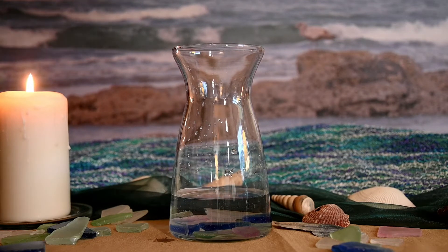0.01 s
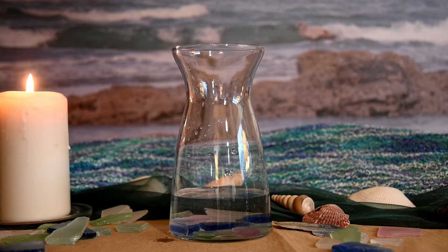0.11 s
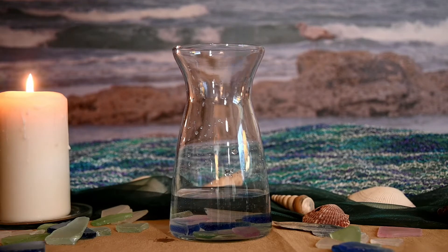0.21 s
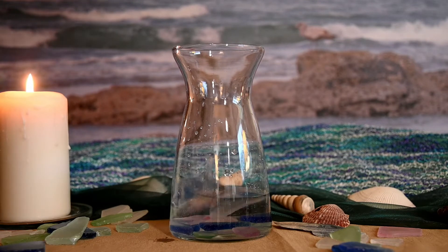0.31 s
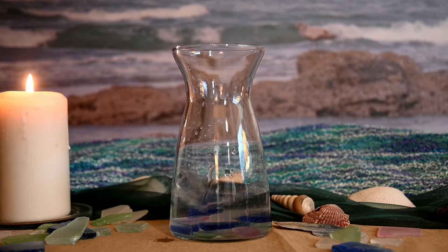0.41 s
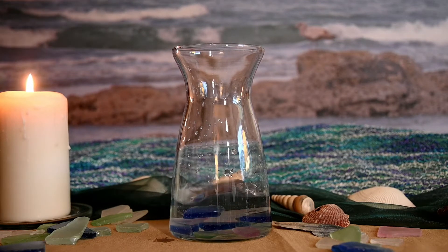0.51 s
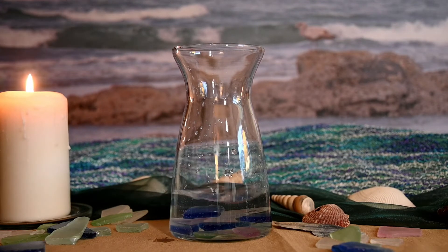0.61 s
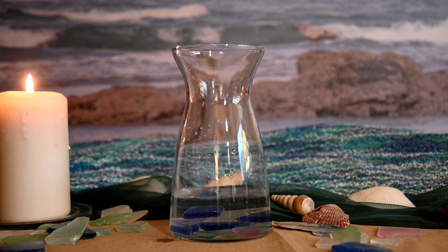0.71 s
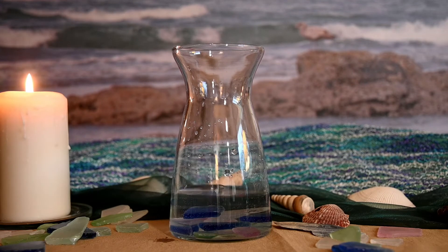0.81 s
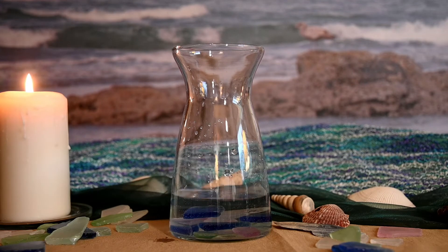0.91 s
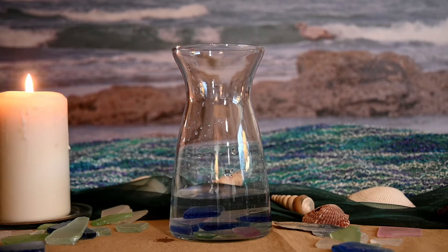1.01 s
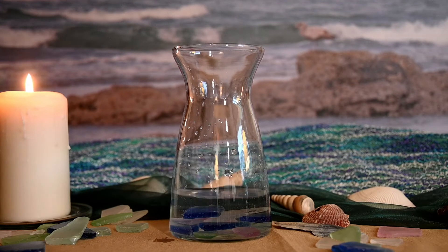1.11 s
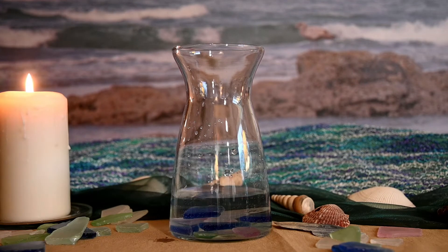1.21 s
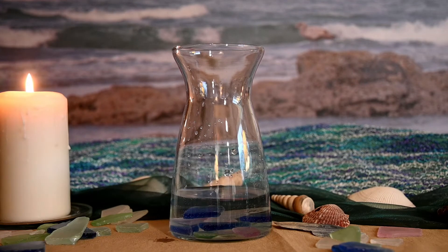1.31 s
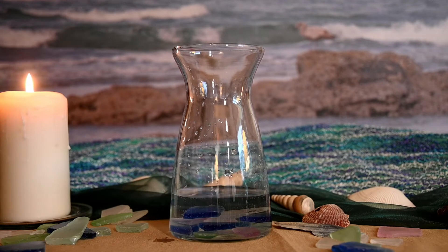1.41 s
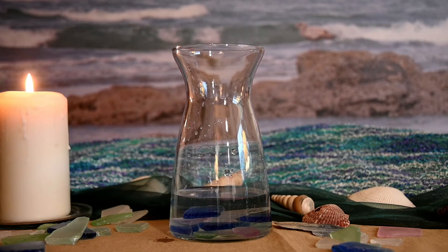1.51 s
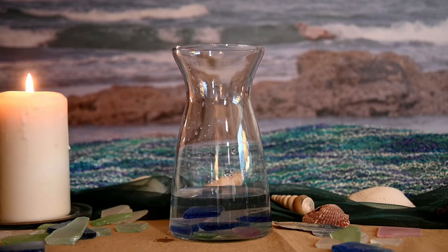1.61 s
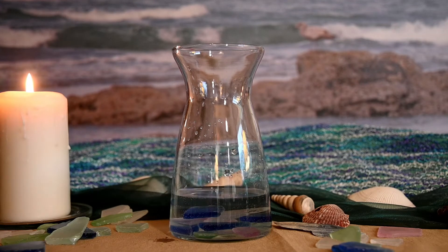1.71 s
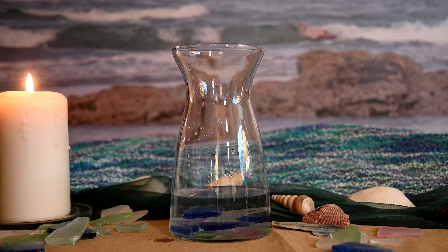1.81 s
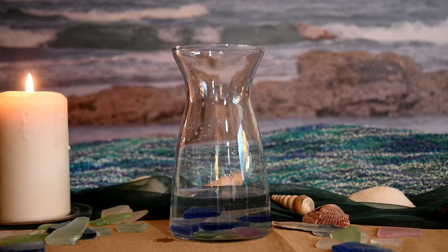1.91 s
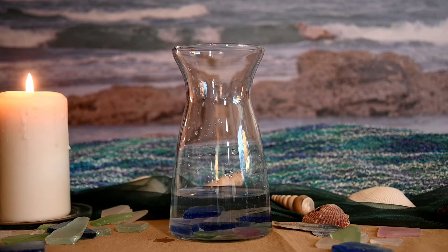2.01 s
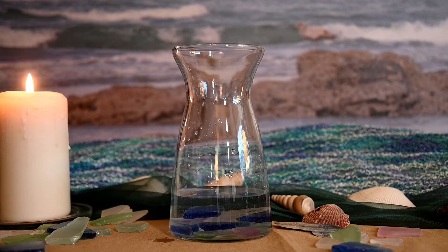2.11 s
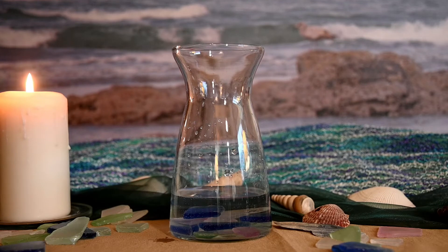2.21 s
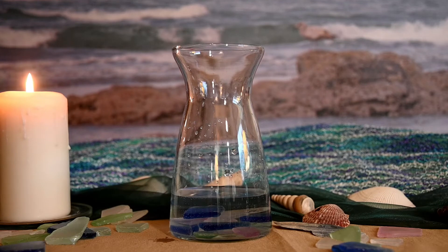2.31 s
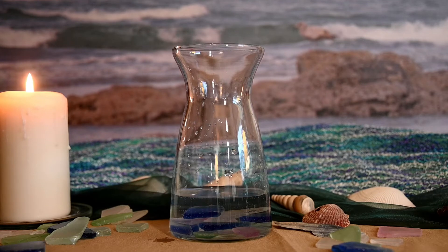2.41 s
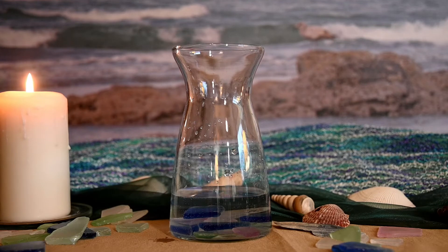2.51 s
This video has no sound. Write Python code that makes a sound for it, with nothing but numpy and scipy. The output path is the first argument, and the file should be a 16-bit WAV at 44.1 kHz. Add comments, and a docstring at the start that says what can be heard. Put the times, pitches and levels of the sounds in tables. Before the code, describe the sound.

A small glass piece strikes a carafe wall, then its base under shallow water, with a bright clink, small splash and brief rattle; afterwards a hand clicks among loose pieces at left. Close stereo microphone, quiet humming room.

```python
"""A glass carafe with a little water takes a dropped piece of glass: decaying modes, cracks and noise bands
sound a blow on the wall, then one on the base; rough rings rock and settle, two bubbles fall in pitch.
Grainy noise splashes. A hand on the left rustles (noise) and clicks (short wave packets) among loose
pieces, with two dull taps and a faint gliding whistle. Steady noise and a wavering hum make the room."""
import sys
import numpy as np
from scipy import signal
from scipy.fft import rfft, irfft
from scipy.io import wavfile

SR = 44100
rng = np.random.default_rng(int(sys.argv[2]) if len(sys.argv) > 2 else 0)


def bounce(signal):
    """Save signal as a 16-bit WAV file at the path given by the first command-line argument."""
    frames = np.transpose(np.atleast_2d(signal))
    limited = np.clip(frames, -1, 1)
    pcm = np.round(limited * 32767).astype(np.int16)
    wavfile.write(sys.argv[1], SR, pcm)


def boost_factor(decibels):
    """Convert a level in decibels to a linear amplitude factor."""
    exponent = np.asarray(decibels, float) / 20
    return 10 ** exponent


N = 114660
T = np.arange(N) / SR
OPPOSITE = np.array([[1], [-1]])  # opposite sign on the two sides
TREBLE_MODE_HZ = 5000  # glass modes above this are changed by sinking and settling
HAND_PAN_DB, LEFT_LEAD_SAMPLES = 5.5, 6


def logint(hz, table):
    """Read (Hz, value) points on a log frequency axis."""
    points = np.array(table, float)
    return np.interp(np.log(np.maximum(hz, 1)), np.log(points[:, 0]), points[:, 1])


def shaped(gain, size=N):
    """Noise of rms 1 with the spectrum gain(Hz)."""
    hz = np.arange(size // 2 + 1) * SR / size
    noise = irfft(rfft(rng.standard_normal(size)) * gain(hz), size)
    return noise / np.std(noise)


def bell(hz, octaves):
    """Gain curve, Gaussian in log frequency."""
    return lambda f: np.exp(-.5 * (np.log2(np.maximum(f, 1) / hz) / octaves) ** 2)


def band(hz, width_hz, order=4):
    """Gain curve of a band of a given width."""
    return lambda f: 1 / (1 + (2 * (f - hz) / width_hz) ** order)


def lowpass(hz, order):
    """Gain curve falling above hz."""
    return lambda f: 1 / (1 + (f / hz) ** order)


def spectrum(table):
    """Gain curve from (Hz, dB) points."""
    return lambda f: boost_factor(logint(f, table))


def fade(t, t60):
    """Exponential decay from t = 0, 60 dB in t60 seconds."""
    return np.exp(-np.log(1000) * np.maximum(t, 0) / t60) * (t >= 0)


def pair(x, pan_db, lead=0):
    """Two channels, left minus right in dB; the left leads by some samples."""
    return np.array([x * boost_factor(pan_db / 2), np.roll(x, lead) * boost_factor(-pan_db / 2)])


def add(out, s, x):
    """Mix a short stereo sound in at s seconds."""
    i = int(s * SR)
    out[:, i:i + x.shape[1]] += x[:, :N - i]


def curve(table, col):
    """Gain over time from a dB column."""
    points = np.array(table, float)
    return boost_factor(np.interp(T, points[:, 0], points[:, col]))


def burst(t, gain, t60, rise_s=.0001):
    """Noise with a fast rise and an exponential decay."""
    return fade(t, t60) * (1 - np.exp(-(t / rise_s) ** 2)) * shaped(gain, len(t))


def ring(t, hz, t60, pan_db, turn_rad):
    """Decaying mode that swells within a cycle; the sides differ by a phase turn."""
    side = np.array([[.5], [-.5]])
    swell = 1 - np.exp(-t * hz * 3.2)
    return boost_factor(side * pan_db) * fade(t, t60) * swell * np.sin(2 * np.pi * hz * t + side * turn_rad)


def tick(t, hz, cycles):
    """Hard contact: a few cycles at random phase, the envelope rising faster than it falls."""
    u = t * hz - 2 * cycles
    envelope = np.exp(-.5 * (u / cycles) ** 2 * np.where(u < 0, 2, .5))
    return envelope * np.cos(2 * np.pi * u + 2 * np.pi * rng.random())


def scatter(x, count=4):
    """Reflections off neighbouring pieces: quick echoes of random delay, size and sign."""
    longest_s, echo_db = .0013, -6.5
    lags_s, sizes = rng.random(count) * longest_s, rng.standard_normal(count)
    out = x
    for lag_s, size in zip(lags_s, sizes):
        gain = boost_factor(echo_db) * size * np.exp(-lag_s / longest_s)
        out = out + gain * np.roll(x, 3 + int(lag_s * SR))
    return out


def grains():
    """Sparse random impulses of uneven size, smeared over about 1 ms, mean power 1."""
    rate_per_s, spread_db = 2900, 2.5
    g = (rng.random(N) < rate_per_s / SR) * boost_factor(spread_db * rng.exponential(size=N))
    g = signal.lfilter([1], [1, -.97], g)
    return g / np.sqrt(np.mean(g ** 2))


# Room noise spectrum. Each row: frequency in Hz, relative density in dB per Hz.
ROOM_COLOUR = [(15, -30), (30, 1), (60, -12.5), (100, -3.5), (150, -6.5), (220, -10.5), (400, -13.5),
               (800, -19.5), (1500, -21.5), (3000, -27.5), (5500, -34.5), (8000, -42.5), (12000, -42.5),
               (16000, -46)]
# Likeness of the two sides. Each row: frequency in Hz, likeness from -1 to 1.
SIDE_LIKENESS = [(60, .93), (130, .96), (290, .85), (640, .5), (1410, .4), (3100, -.1), (6820, 0),
                 (15000, .1)]
# Hum bands. Each row: centre in Hz, width in Hz, level in dB.
HUM_BANDS = [(106, 14, -69.5), (137, 29, -59)]


def room():
    """Steady noise, alike on both sides in the bass, plus narrow noise bands as a wavering hum."""
    like = lambda f: np.clip(logint(f, SIDE_LIKENESS), -.9, .98)
    shared = lambda f: spectrum(ROOM_COLOUR)(f) * np.sqrt(1 + like(f))
    opposed = lambda f: spectrum(ROOM_COLOUR)(f) * np.sqrt(1 - like(f))
    f = np.arange(N // 2 + 1) * SR / N
    ratio = np.sqrt(np.sum(opposed(f) ** 2) / np.sum(shared(f) ** 2))
    out = boost_factor(-56) * (shaped(shared) + ratio * shaped(opposed) * OPPOSITE)
    for hz, width_hz, db in HUM_BANDS:
        out = out + boost_factor(db) * shaped(band(hz, width_hz, order=2))
    return out


# Whistle glide. Each row: time in seconds, frequency in Hz, level in dB before panning.
WHISTLE_PATH = [(1.6, 12000, -90), (1.63, 11300, -78), (1.67, 10300, -76), (1.7, 10000, -90),
                (1.74, 10300, -80), (1.9, 10400, -80), (2.0, 10500, -77), (2.06, 10900, -81),
                (2.08, 11000, -100)]


def whistle():
    """A thin, faint sine whose frequency follows the path."""
    path = np.array(WHISTLE_PATH, float)
    hz = np.interp(T, path[:, 0], path[:, 1])
    tone = np.sin(2 * np.pi * np.cumsum(hz) / SR)
    sounding = (T > path[0, 0]) * (T < path[-1, 0])
    return pair(curve(WHISTLE_PATH, 2) * sounding * tone, HAND_PAN_DB, LEFT_LEAD_SAMPLES)


# Rustle drive. Each row: time in seconds, then relative dB of the hiss, of its top band, of its low band.
RUSTLE_DRIVE = [(.55, -68, -96, -84), (.66, -74.5, -89, -86), (.75, -67, -76, -68), (.86, -73, -83, -70),
                (.89, -66.5, -77, -66.5), (.94, -70.5, -68, -71), (1.0, -69, -83, -76),
                (1.04, -73.5, -75, -78), (1.12, -71, -87.5, -70.5), (1.25, -71.5, -89, -62),
                (1.31, -76, -93.5, -74), (1.39, -78, -89, -73.5), (1.42, -63.5, -71, -67),
                (1.46, -60.5, -76, -69), (1.50, -72, -96, -70), (1.525, -64.5, -68, -70),
                (1.57, -73.5, -88, -67.5), (1.60, -62, -75, -67), (1.64, -79, -91, -70.5),
                (1.73, -73.5, -77.5, -70), (1.76, -62, -75, -64.5), (1.81, -63, -60, -67.5),
                (1.84, -56, -62, -65), (1.87, -60.5, -65, -67), (1.89, -75, -89, -72.5),
                (2.04, -68.5, -87, -69), (2.1, -52, -78, -66), (2.2, -69, -93, -70),
                (2.3, -59.5, -68, -63.5), (2.38, -57, -68, -66.5), (2.43, -77, -100, -74.5),
                (2.6, -73, -85.5, -78)]
# Hiss spectrum. Each row: frequency in Hz, relative density in dB per Hz.
HISS_COLOUR = [(1000, -40), (2200, -3), (3600, 0), (5400, 1), (7500, -4), (10000, -8), (12000, -12),
               (16000, -16)]
# Top band. Each row: centre in Hz, width in Hz, relative level in dB.
TOP_BANDS = [(14800, 450, 0), (15550, 400, -1)]


def rustle():
    """The hand's friction: three grainy noise bands, each with a left-leading part and a wide part."""
    out = np.zeros((2, N))
    top = lambda f: sum(boost_factor(db) * band(hz, width_hz)(f) for hz, width_hz, db in TOP_BANDS)
    grit = 1 + boost_factor(-6) * grains()
    started = T > RUSTLE_DRIVE[0][0]
    for col, gain in enumerate((spectrum(HISS_COLOUR), top, bell(1130, 1)), start=1):
        wide = boost_factor(1.0) * np.array([shaped(gain), shaped(gain)])
        noise = pair(shaped(gain), HAND_PAN_DB, LEFT_LEAD_SAMPLES) + wide
        out += curve(RUSTLE_DRIVE, col) * started * grit * noise
    return out


# Dull taps. Each row: start in seconds, drive in dB, centre in Hz.
DULL_TAPS = [(0.7279, -37, 1067), (1.5265, -37, 1900)]


def taps():
    """A short wave packet with a little noise round the same centre."""
    out, t = np.zeros((2, N)), T[:4096]
    for s, db, hz in DULL_TAPS:
        tap = tick(t, hz, .27) + .17 * burst(t, bell(hz, .35), .022)
        add(out, s, pair(boost_factor(db) * tap, 0))
    return out


# Loose pieces. Each row: start in seconds, drive in dB, centre in Hz, left minus right in dB of the click,
# relative top ring in dB, relative body in dB.
PIECE_CLICKS = [(0.8818, -39, 6140, 3, 2, -10), (0.9245, -38, 5350, 8, -4, -11),
                (1.521, -38.5, 7800, 8, -9, -14), (1.585, -42, 7000, 5, -8, -11),
                (1.5313, -40.5, 5450, 14, -19, -15), (1.678, -46, 6050, -1, -28.5, -20),
                (1.6824, -39.5, 5300, 13, -29, -20), (1.7587, -34, 5970, 4, -0.5, -14),
                (1.8273, -26, 8700, 11, -13, -15), (1.8627, -36.5, 5600, 11, -12, -2.5),
                (1.9232, -36, 6200, 8, -25, -24), (1.9626, -36.5, 4840, 2, -22, -12),
                (2.0734, -22.5, 5400, 9, -20, -22), (2.0759, -15.5, 7800, 4.5, -28, -13),
                (2.1005, -6.5, 8060, 13, -14, -43), (2.111, -25.5, 9000, 24, -21, -33),
                (2.1594, -21, 8650, 6, -19, -14.5), (2.1849, -24, 7800, 5, -17, -20),
                (2.2124, -37, 5470, 10, -30, -9), (2.2457, -33, 7500, 4, -33, -13),
                (2.2618, -32, 5250, 10, -27, -28), (2.2742, -26, 5070, 6, -24, -29),
                (2.2932, -25.5, 7240, -1, -29, -30), (2.2965, -28, 7050, 10, -30, -27),
                (2.318, -12.5, 9600, 7, -6.5, -15), (2.3255, -14, 9000, 5.5, -16, -16),
                (2.3288, -23.5, 9000, 8, 0, -27), (2.3406, -13.5, 8700, 8.5, -13, -19.5),
                (2.3755, -28.5, 7800, 10, -19, -29)]


def clicks():
    """Contacts of loose pieces: scattered packets, softer when weak, with noise and a hissing tail."""
    out, t = np.zeros((2, N)), T[:4096]
    hard_db, soften_db_per_db = -22, .45  # weaker drive turns the contact into a soft scuff
    for s, db, hz, pan_db, top_db, body_db in PIECE_CLICKS:
        hardness = boost_factor(soften_db_per_db * min(db - hard_db, 0))
        contact = tick(t, hz, .54) + boost_factor(body_db) * tick(t, 2550, .45)
        scuff = boost_factor(-11.5) * burst(t, bell(hz, .6), .006, .00013)
        top = boost_factor(top_db) * burst(t, bell(16000, .088), .011, .0003)
        click = hardness * scatter(contact) + scuff + top
        tail = np.array([burst(t, bell(5300, .73), .09, .00012) for _ in range(2)])
        add(out, s, boost_factor(db) * (pair(click, pan_db, LEFT_LEAD_SAMPLES) + boost_factor(-27) * tail))
    return out


# Splash drive. Each row: time in seconds, relative level in dB.
SPLASH_DRIVE = [(.229, -61), (.232, -29), (.26, -34), (.286, -24), (.288, -18), (.33, -30), (.37, -39.5),
                (.45, -47.5), (.51, -45.5), (.56, -59), (.6, -102)]
# Water spectrum. Each row: frequency in Hz, relative density in dB per Hz.
WATER_COLOUR = [(60, -43), (150, -9), (400, -18), (1000, -28), (2000, -23), (3500, -19), (6000, -20.5),
                (9000, -28.5), (11500, -35.5), (15500, -31.5), (16500, -54.5)]


def splash():
    """Water thrown up by the blows: noise multiplied by grains, partly opposed between the sides."""
    gain = spectrum(WATER_COLOUR)
    wide = boost_factor(-8) * shaped(gain) * OPPOSITE
    return curve(SPLASH_DRIVE, 1) * (.1 + .29 * grains()) * (pair(shaped(gain), -.8) + wide)


# Bubbles. Each row: start in seconds, starting pitch in Hz, drive in dB, t60 in seconds before the burst,
# burst delay in seconds.
WATER_BUBBLES = [(.364, 1165, -37, .2, .034), (.776, 2050, -60, .05, .012)]


def bubbles():
    """Bubbles hum as wavering sines falling in pitch, and fade faster once they burst."""
    out, t = np.zeros((2, N)), T[:SR // 2]
    pitch_slope_per_s, burst_t60_s = -.6, .075
    for s, hz, db, t60, life_s in WATER_BUBBLES:
        waver = 1 + .3 * shaped(lowpass(60, 4), len(t))
        decay = fade(t, t60) * fade(np.maximum(t - life_s, 0), burst_t60_s)
        tone = np.sin(2 * np.pi * hz * t * (1 + pitch_slope_per_s * t / 2))
        add(out, s, pair(boost_factor(db) * waver * decay * tone, -1.5))
    return out


# Modes of the sinking piece. Each row: frequency in Hz before sag, relative level in dB, t60 in seconds.
PIECE_MODES = [(500, 13.5, 0.24), (2300, -14.5, 0.083), (2760, 4, 0.09), (2840, -20, 0.11),
               (3280, -2, 0.067), (3880, 1.5, 0.038), (5400, -8, .07), (5750, -2, 0.16), (6360, 0.5, 0.075),
               (7500, 2, 0.053), (8300, 2, 0.15), (9200, -3, 0.081), (9900, -20, .06), (10680, -2, 0.079)]
# Rocking contacts. Each row: start in seconds, drive in dB, centre in Hz, width in octaves.
ROCKING = [(.365, -33, 1310, 0.55), (0.372, -35.5, 3000, 0.65), (0.372, -39.5, 10600, 0.22),
           (0.381, -48, 9700, 0.4), (.388, -55, 700, 0.56), (.395, -42, 7000, 1), (0.409, -43, 7500, 0.92),
           (.417, -44.5, 2800, 0.49), (0.423, -45, 8750, 0.56), (0.434, -42, 2800, .3),
           (0.442, -39, 5460, 0.75), (0.4501, -33, 3250, 0.37), (0.463, -39.5, 3480, 0.9),
           (0.469, -38.5, 3020, 0.37), (0.48, -36, 3020, 0.71), (0.486, -49, 5550, 0.69),
           (0.495, -41, 5800, 0.44), (0.504, -51.5, 6000, 0.73), (.513, -57, 5900, 0.27),
           (.525, -59, 5000, 0.64)]


def rocking():
    """The piece rocks against others: a noise burst and roughly wavering modes, treble sagging in time."""
    out = np.zeros((2, N))
    sag_per_s, sag_from_s, rough_hz = .45, .42, 244
    for s, db, centre_hz, octaves in ROCKING:
        gain = bell(min(centre_hz, 6000), octaves / 2 + .18)
        add(out, s, pair(boost_factor(db - 1.5) * burst(T[:2048], gain, .01, .00071), -1.5))
        for hz, mode_db, t60 in PIECE_MODES:
            drift = sag_per_s * (s - sag_from_s) + .02 * rng.standard_normal()
            sag = 1 - (hz > TREBLE_MODE_HZ) * drift
            waver = .5 + hz / 15700 * shaped(lowpass(rough_hz, 2), 8192)
            level = boost_factor(db + mode_db) * (bell(centre_hz, octaves)(hz) + .046)
            add(out, s, level * waver * ring(T[:8192], hz * sag, t60, -1.1, 1))
    return out


# Modes rung by the blows, of the carafe and of the falling piece. Each row: frequency in Hz, t60 in seconds
# before sinking.
BLOW_MODES = [(160, .15), (200, .15), (246, .12), (513, .17), (2173, .11), (2500, .2), (2761, .16),
              (3015, .1), (3285, .13), (3600, .14), (4264, .15), (4670, .15), (5080, .12), (5227, .15),
              (5340, .15), (5375, .2), (5445, .15), (5830, .15), (6831, .14), (6915, .14), (8230, .07),
              (9722, .15), (10420, .1), (13325, .2), (14760, .18)]
# Mode strengths, in the same order. Each row: dB struck on the wall, dB struck on the base,
# left minus right in dB.
MODE_STRENGTH = [(-27, -18.5, 0.5), (-32, -16, -2.5), (-32.5, -20, 2), (-23.5, -10, -1), (-35, -21, -2),
                 (-40, -32, 0), (-9, -7.5, 0), (-35.5, -29, 0.5), (-32.5, -19, -1), (-36, -21, 0.5),
                 (-35, -34, 1.5), (-24, -21.5, 0), (-18.5, -29, 4), (-18, -38, 1.5), (-11.5, -28.5, 1),
                 (-16.5, -21.5, -1.5), (-15.5, -30, 1), (-25.5, -25.5, 1.5), (-22, -34, 2),
                 (-10.5, -32, 2.5), (-20.5, -19, 0), (-15.5, -34, 2), (-25, -40, -0.5), (-17.5, -44.5, 1.5),
                 (-25.5, -44.5, 4.5)]
# Blows. Each row: start in seconds, ring drive in dB, share on the base from 0 to 1, crack drive in dB,
# crack centre in Hz.
GLASS_BLOWS = [(.2311, -9, 0, 3, 6300), (.2874, -9, 1, -11, 3800)]
# Dense rough ring. Each row: centre in Hz, width in Hz, wall drive in dB, base drive in dB, t60 in seconds.
CLATTER_BANDS = [(5280, 1100, -25.5, -32, 0.23), (5400, 660, -14.5, -30, .035),
                 (3450, 1200, -43.5, -28.5, 0.079), (2760, 420, -39.5, -30.5, 0.18),
                 (7800, 3000, -35.5, -29.5, .1), (1530, 930, -35.5, -38.5, 0.073)]


def blows():
    """Each blow rings the modes of carafe and falling piece, cracks and clatters; treble modes die faster once
    the piece is under water."""
    out, t = np.zeros((2, N)), T[:SR // 2]
    sunk_at_s, sunk_t60_s = .288, .09
    for s, db, base, crack_db, crack_hz in GLASS_BLOWS:
        sunk = fade(np.maximum(t + s - sunk_at_s, 0), sunk_t60_s)
        for (hz, t60), (wall_db, base_db, pan_db) in zip(BLOW_MODES, MODE_STRENGTH):
            damping = sunk if hz > TREBLE_MODE_HZ else 1
            level = boost_factor(db + wall_db + base * (base_db - wall_db))
            add(out, s, level * damping * ring(t, hz, t60, pan_db, .34 + hz / 6000))
        short = t[:2048]
        crack = tick(short, crack_hz, .35) + boost_factor(-2.0) * burst(short, bell(crack_hz, 1), .003)
        add(out, s, pair(boost_factor(crack_db) * crack, -1.5))
        for hz, width_hz, wall_db, base_db, t60 in CLATTER_BANDS:
            middle = burst(t, band(hz, width_hz), t60)
            wide = .45 * burst(t, band(hz, width_hz), t60) * OPPOSITE
            add(out, s, boost_factor(wall_db + base * (base_db - wall_db)) * (middle + wide))
    return out


def scene():
    """Room, hand, water and carafe together."""
    hand = whistle() + rustle() + taps() + clicks()
    carafe = bubbles() + rocking() + blows()
    return room() + hand + splash() + carafe


def roll_off(x):
    """The treble ends steeply here."""
    return signal.sosfilt(signal.butter(12, 17190, fs=SR, output="sos"), x)


def record(dry):
    """The recorder cuts the top steeply and clips at full scale."""
    top_cut = signal.ellip(6, .2, 30, 15950, fs=SR, output="sos")
    mix = np.clip(signal.sosfilt(top_cut, dry), -1, 1)
    return roll_off(mix)


dry = scene()
out = record(dry)
bounce(out)
```